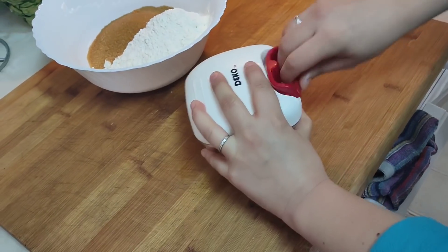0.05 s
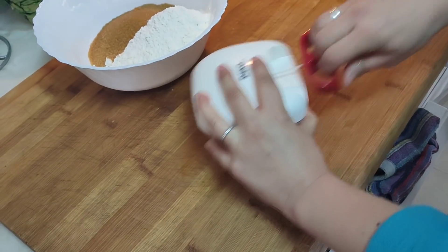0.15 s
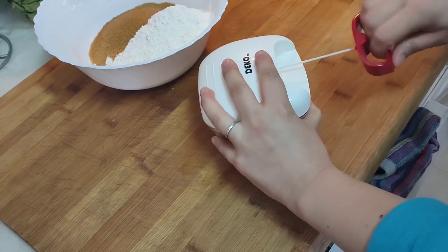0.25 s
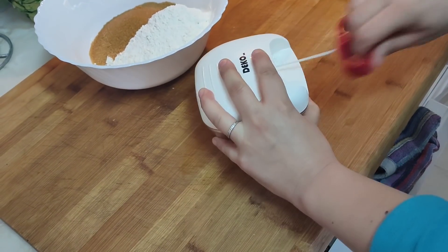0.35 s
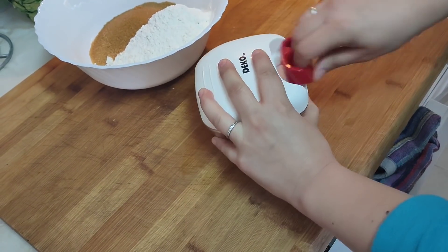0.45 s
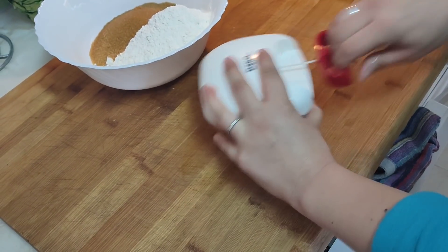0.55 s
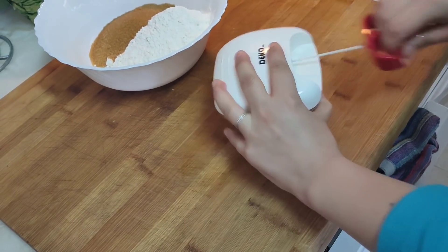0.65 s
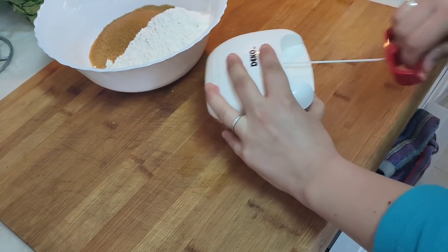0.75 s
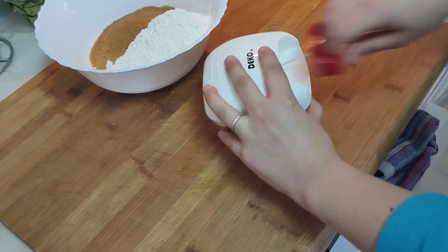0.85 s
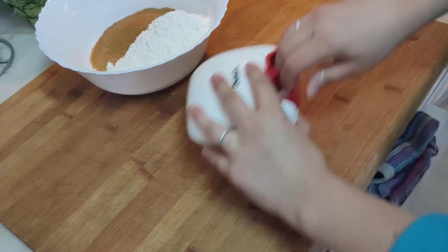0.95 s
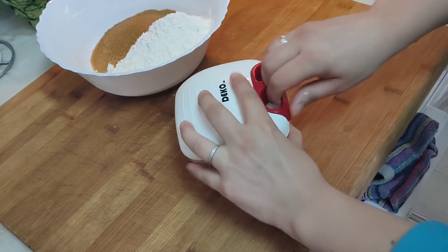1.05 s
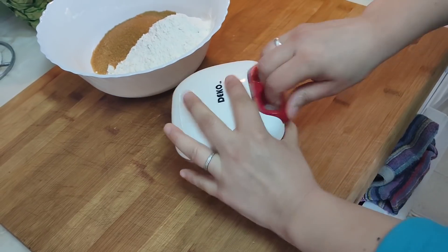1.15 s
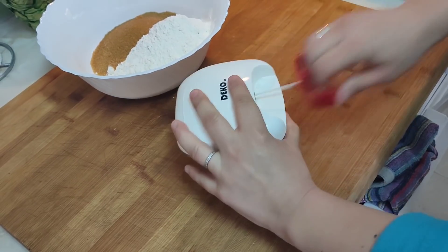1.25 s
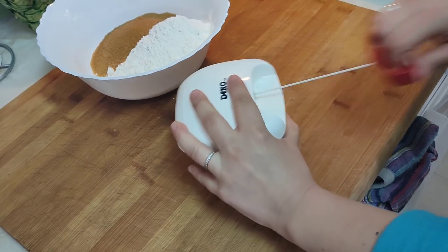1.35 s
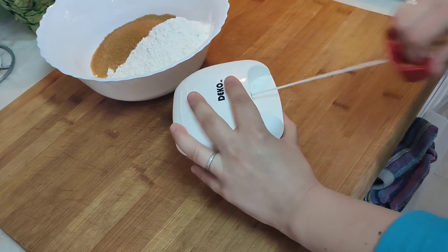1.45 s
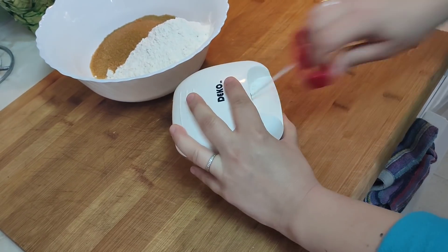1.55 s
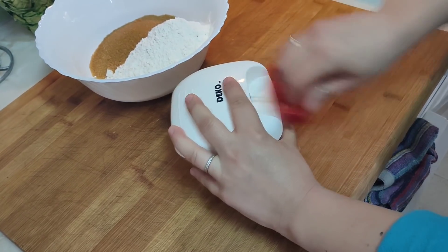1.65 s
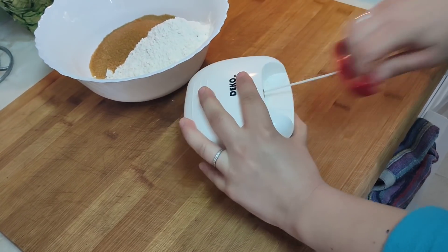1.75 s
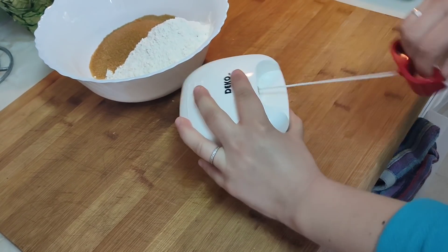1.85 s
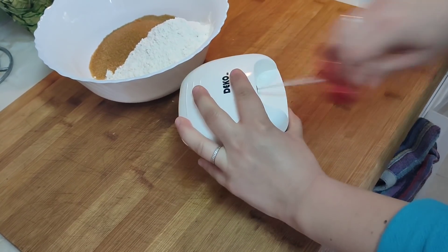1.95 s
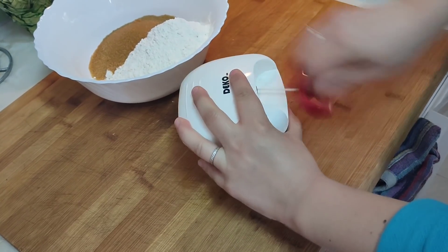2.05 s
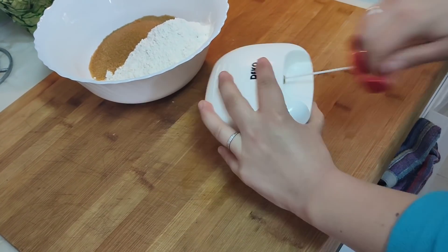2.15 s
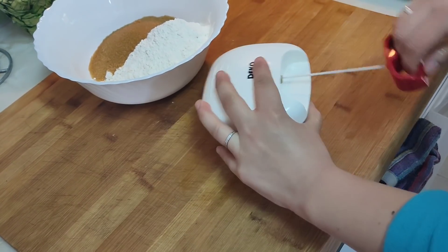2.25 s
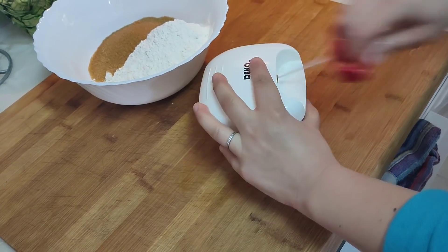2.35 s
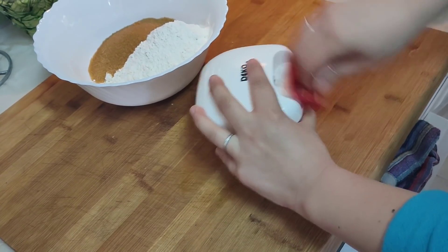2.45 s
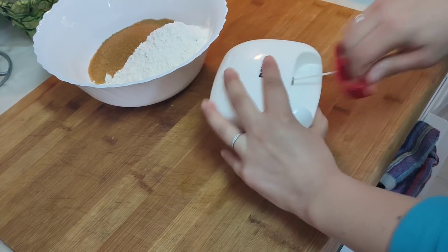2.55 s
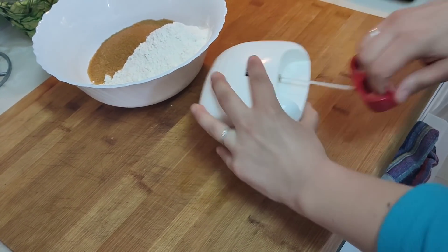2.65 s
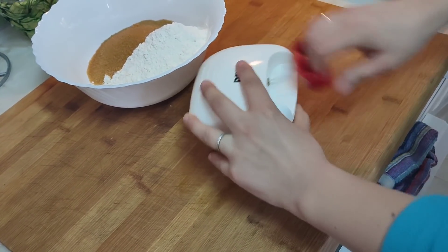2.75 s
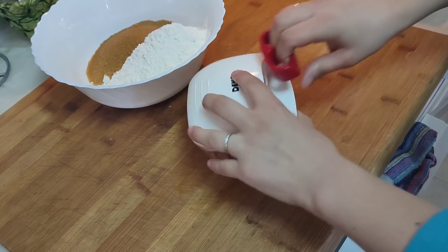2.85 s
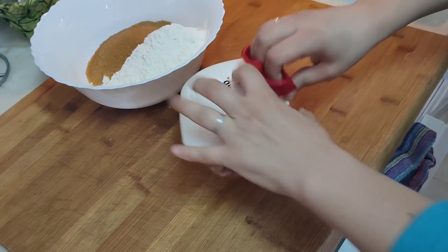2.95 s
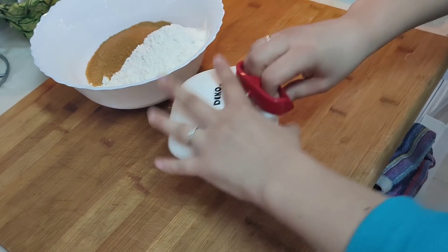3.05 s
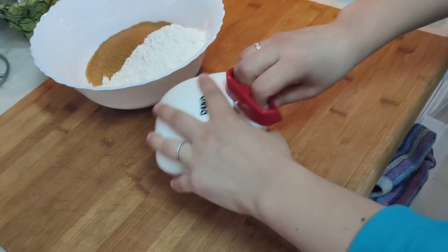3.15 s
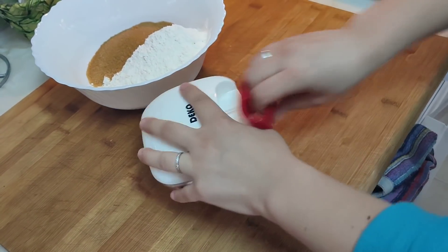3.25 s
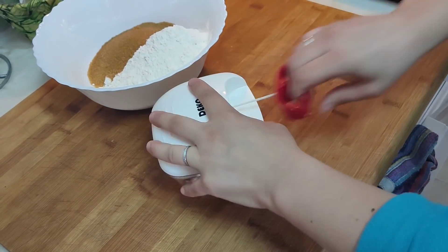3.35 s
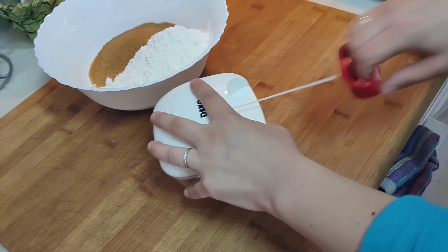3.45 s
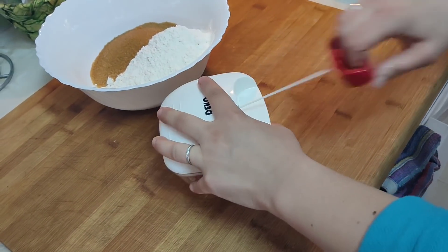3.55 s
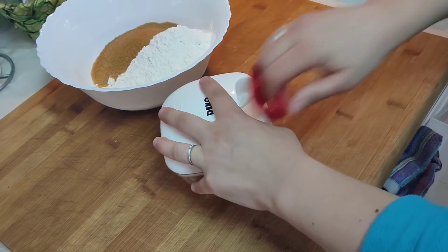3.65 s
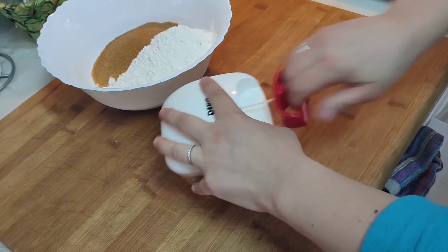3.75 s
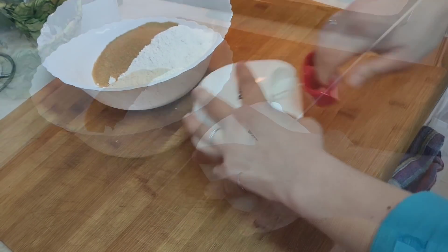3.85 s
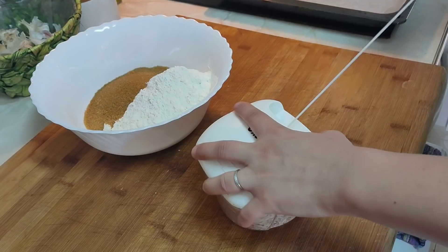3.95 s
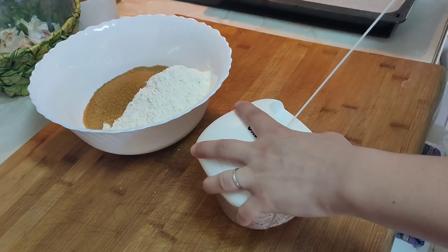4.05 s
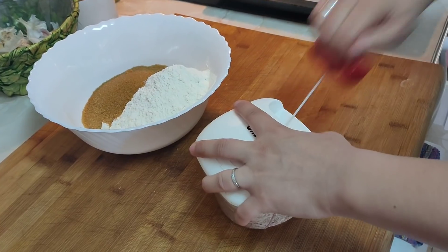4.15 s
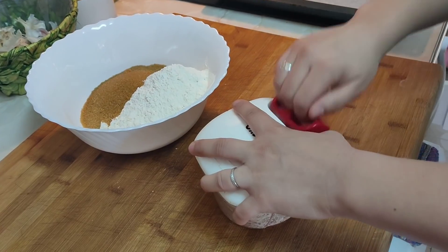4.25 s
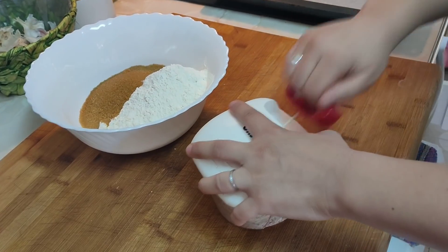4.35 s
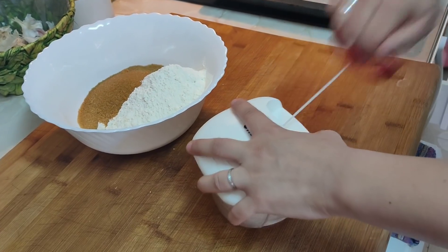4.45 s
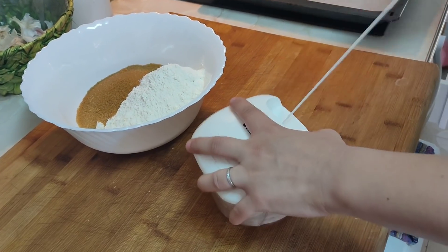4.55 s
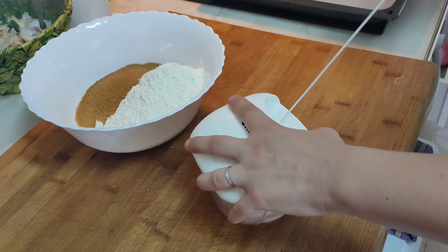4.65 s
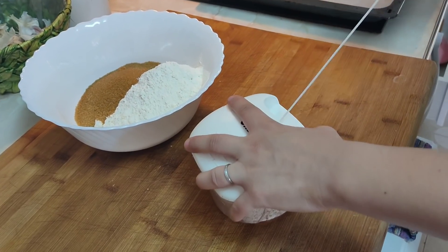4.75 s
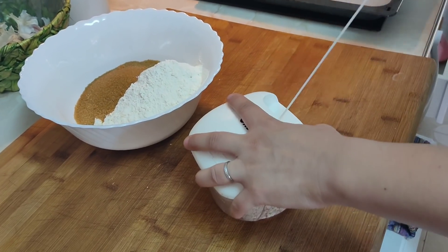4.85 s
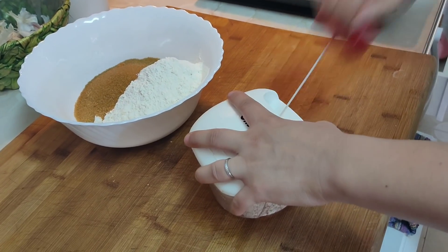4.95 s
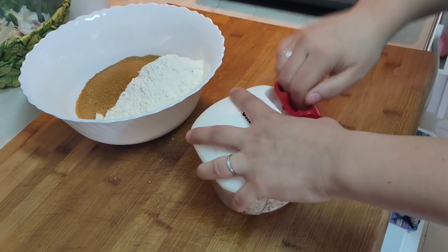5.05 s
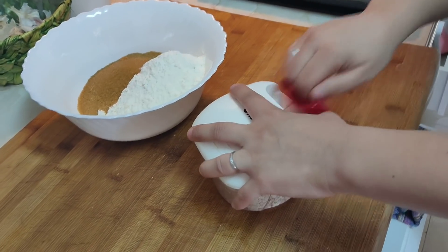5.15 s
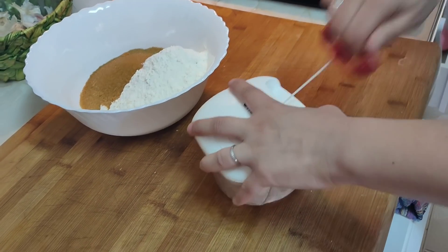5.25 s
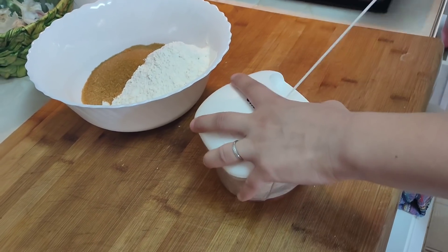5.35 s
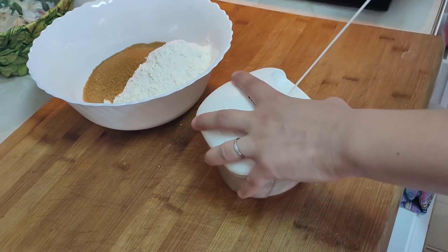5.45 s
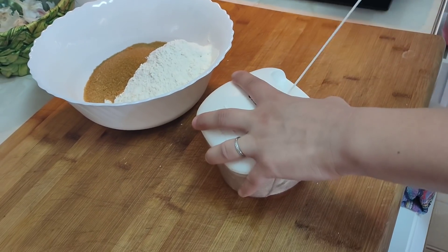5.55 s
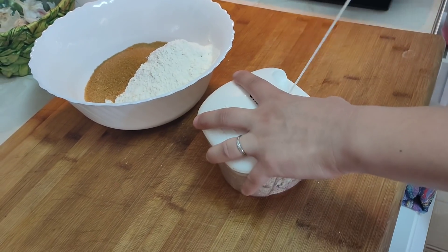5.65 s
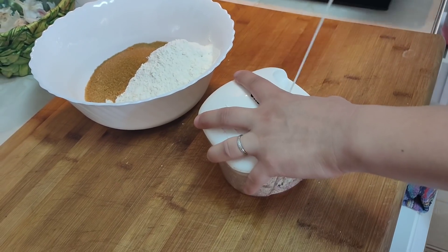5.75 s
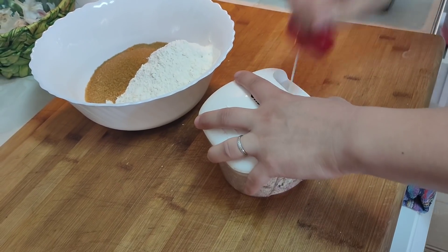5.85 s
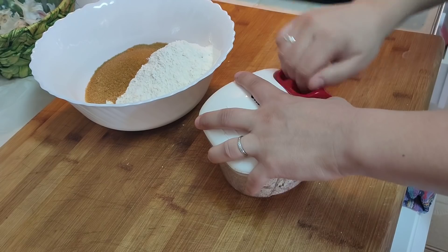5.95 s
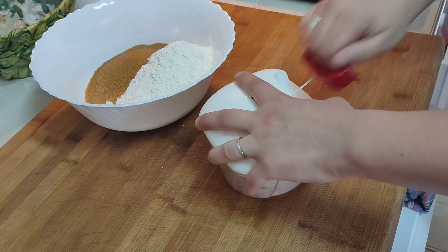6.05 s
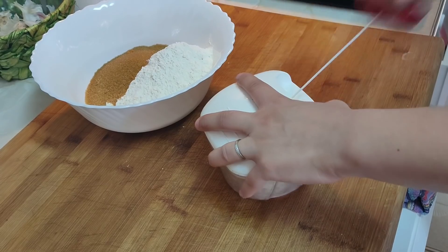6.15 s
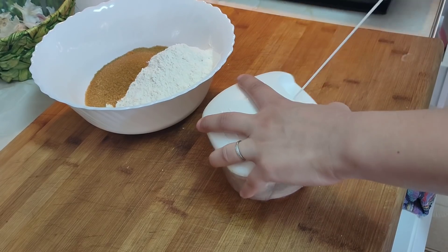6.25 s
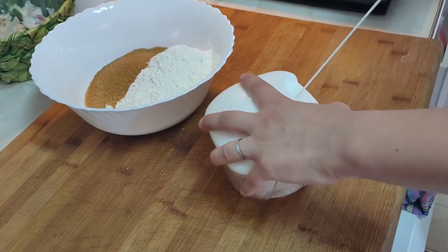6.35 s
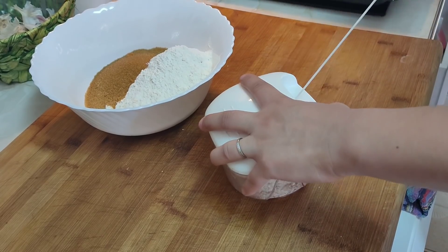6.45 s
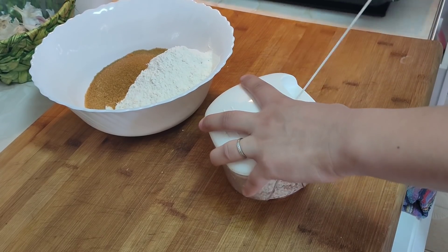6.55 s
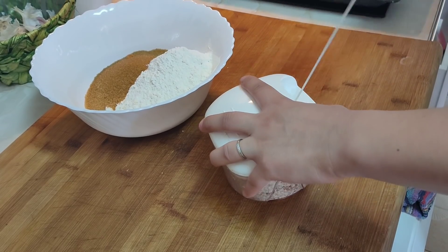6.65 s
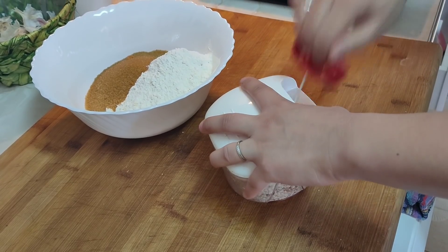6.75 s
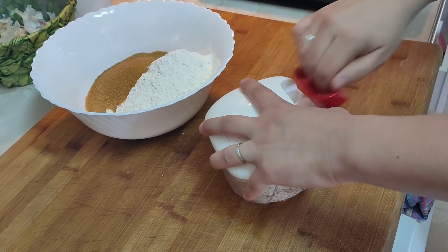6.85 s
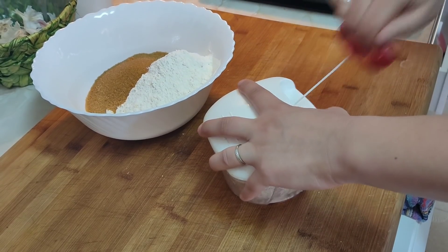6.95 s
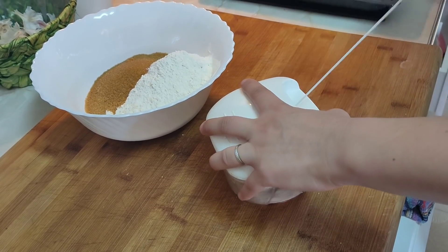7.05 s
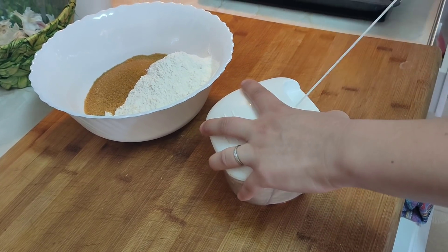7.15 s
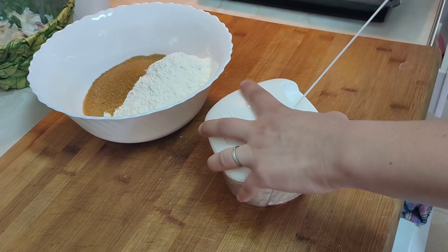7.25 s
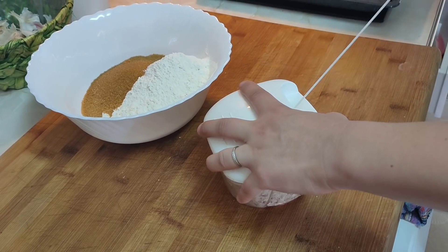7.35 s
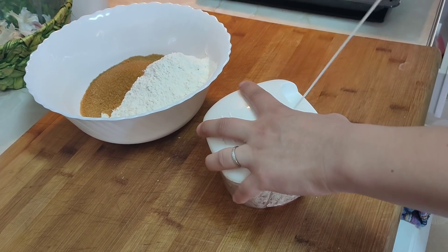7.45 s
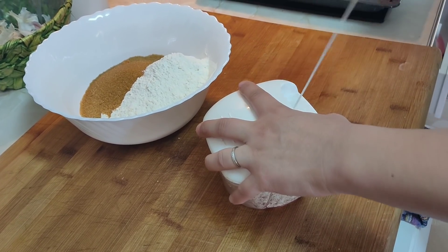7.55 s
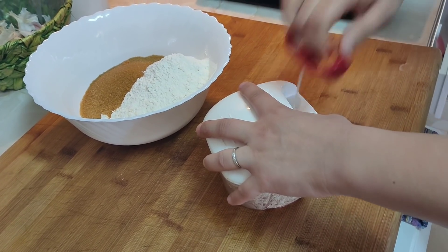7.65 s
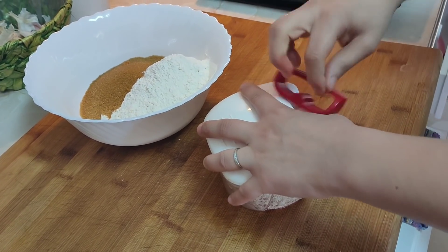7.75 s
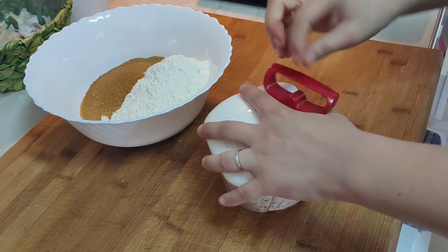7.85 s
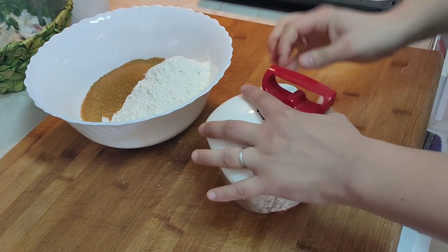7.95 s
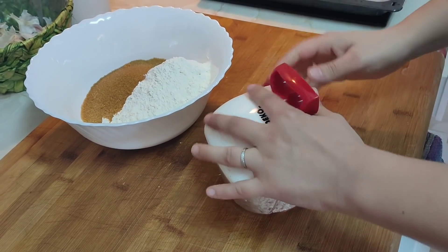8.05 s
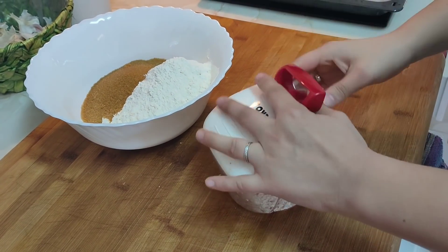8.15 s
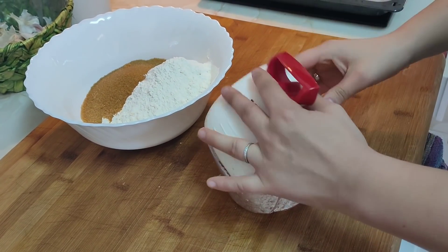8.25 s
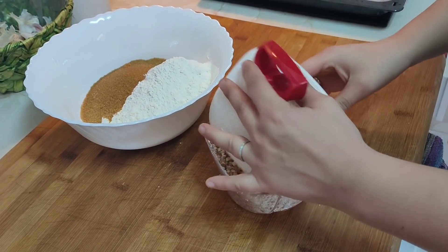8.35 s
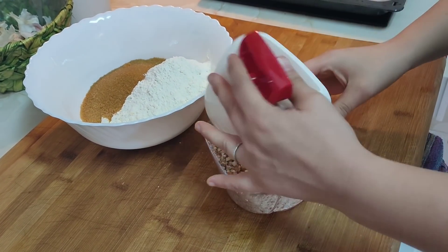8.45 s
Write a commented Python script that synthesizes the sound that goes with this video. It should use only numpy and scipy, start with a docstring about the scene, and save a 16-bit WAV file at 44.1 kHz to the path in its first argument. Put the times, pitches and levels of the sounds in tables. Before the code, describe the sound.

A pull-cord chopper works through nuts on a wooden board, heard close up in a small, slightly reverberant kitchen over a faint hum. From about 0.3 to 3 seconds, six quick pulls come roughly half a second apart. Each starts abruptly with a loud, crackling rattle of coarse pieces against the plastic cup, then dies away over a low boom. The handle clacks on the lid between pulls, and there are a few tiny squeaks. Another loud pull swells at about 3.4 seconds, after which the pieces sound finer. Four slower, somewhat softer pulls follow at around 4.5, 5.3, 6.2 and 7 seconds, with quieter cord rewinds and scattered plastic knocks around them. A last rewind near 7.5 seconds ends in a sharp clack at 7.8. From about 8.1 to 8.5 seconds, a hand faintly rubs and bumps the hollow lid.

```python
"""Chopping nuts in a pull-cord chopper

Each pull spins a blade that throws nut pieces against a small plastic cup on a wooden board. Impacts
excite cup, chips and a low boom of room and board, and the pieces turn from coarse to fine. The cord
rewinds more softly, cord or spindle squeaks, the handle knocks on the lid and a hand rubs it at the end.
A small hard kitchen reverberates over a faint hum; a two-port phone microphone listens close by."""
import sys
import numpy as np
from scipy import signal
from scipy.fft import rfft, irfft, next_fast_len
from scipy.io import wavfile
from scipy.ndimage import uniform_filter1d

SR = 44100
rng = np.random.default_rng(int(sys.argv[2]) if len(sys.argv) > 2 else 0)


def unload_audio(sound):
    """Save the sound as a 16-bit wav file, at the path given as the first command line argument."""
    columns = np.transpose(np.atleast_2d(sound))
    # keep every value between -1 and 1, then stretch to whole-number steps
    steps = np.round(np.clip(columns, -1, 1) * 32767)
    wavfile.write(sys.argv[1], SR, steps.astype(np.int16))


N = 375291
T = np.arange(N) / SR


def undb(db):
    """Amplitude ratio of a level in decibels."""
    return 10 ** (np.asarray(db) / 20)


def unit(x):
    """Normalisation to an rms of 1."""
    return x / np.sqrt(np.mean(x ** 2))


def at_frequency(table, hz):
    """Interpolation of (frequency, value) rows on a logarithmic frequency axis."""
    return np.interp(np.log(hz), np.log(np.array(table)[:, 0]), np.array(table)[:, 1])


def resonate(x, hz, width):
    """Second-order resonance with unit gain at its centre."""
    return signal.lfilter(*signal.iirpeak(hz, hz / width, SR), x)


def flutter(rate):
    """Random modulation: ramps between `rate` values a second, with a spread near 1."""
    step = int(SR / rate)
    held = np.repeat(rng.standard_normal(N // step + 1), step)
    return 1.2 * uniform_filter1d(held, step)[:N]


# Likeness of the sound at the two microphone ports: (frequency [Hz], coherence [0-1])
COHERENCE = [(60, 0.8), (250, 1), (520, 0.3), (750, 0.3), (950, 0.18), (1150, 0.4), (1500, 0), (2200, 0.02),
             (3100, 0), (15000, 0)]
def both_ports(mid, side, hz):
    """Spatial coherence: bass reaches both ports alike; treble leaves different walls and differs."""
    correlation = np.sqrt(at_frequency(COHERENCE, hz))
    opposed = side * np.array([[1], [-1]])
    return np.sqrt((1 + correlation) / 2) * mid + np.sqrt((1 - correlation) / 2) * opposed


# Spectrum of the quiet kitchen: (frequency [Hz], relative spectral density [dB])
MURMUR_SPECTRUM = [(18, -47), (30, -21.5), (319, 3.5), (499, -11.5), (584, -4), (1500, -25), (2120, -22.5),
                   (3980, -35), (8980, -26.5), (16000, -43.5)]
def hum(murmur_db=-60, mains_db=-76, mains_hz=101):
    """Background noise: a steady murmur of appliances and air, plus a mains tone of wavering level."""
    hz = np.fft.rfftfreq(N, 1 / SR) + 1
    mid, side = irfft(rfft(rng.standard_normal((2, N))) * undb(at_frequency(MURMUR_SPECTRUM, hz)), N)
    mains = undb(mains_db + 1.57 * flutter(4.4)) * np.sqrt(2) * np.sin(2 * np.pi * mains_hz * T)
    return undb(murmur_db) * unit(both_ports(mid, side, 400)) + mains


def fineness(time):
    """Fragmentation: 0 for coarse pieces, rising to 1 for fine crumbs."""
    return np.interp(time, (3.63, 4.05), [0, 1])


# The hand shifts cup or handle and the pieces slide:
# (start [s], rise [s], hold [s], coast [s], cup level [dB], chips re cup [dB], boom re cup [dB])
HAND_SHIFTS = [(0.0, 0.0012, .06, 0.27, -53.5, -5.5, -2), (0.19, 0.0084, .065, 0.026, -42, -6, -0.5),
               (0.622, .006, .02, 0.13, -40.5, -14, -6), (1.1, 0.022, .02, .1, -45.5, -14.5, -0.5),
               (1.24, .006, 0.02, .02, -47.5, -16, 9), (3.03, .01, 0.036, .06, -64.5, -9, 6.5),
               (2.165, .006, .045, 0.017, -38, -10.5, -9.5), (2.59, .006, .045, 0.018, -52.5, -5, 2.5),
               (3.158, 0.005, .05, 0.14, -49.5, -9, 7), (3.26, 0.058, .01, .04, -44.5, -4, 0.5),
               (3.346, 0.014, .04, 0.045, -43, -22.5, -22), (4.39, 0.031, .01, .02, -55, -14, 1),
               (5.2, 0.056, .01, .02, -71, -17, 1), (6.112, 0.017, .01, 0.038, -36.5, -2, -5.5),
               (8.284, 0.0063, .03, .06, -65, -8, 14), (8.35, .01, .1, .2, -75, -4, -4)]
# The cord spins the blade, which then coasts to rest: (same columns)
CORD_PULLS = [(0.262, 0.024, 0.047, 0.29, -19.5, -1, -11), (0.698, 0.021, 0.069, 0.31, -19.5, -1.5, -10.5),
              (1.334, 0.015, 0.14, 0.35, -22.5, 0, -9.5), (1.798, 0.028, 0.081, 0.36, -19, -1, -11),
              (2.215, 0.017, 0.05, 0.35, -20.5, -0.5, -8.5), (2.639, .018, 0.056, .28, -20.5, 0.5, -10),
              (3.386, 0.13, 0.015, 0.33, -20, 0.5, -8.5), (4.472, 0.14, 0.12, 0.17, -26.5, -4, -2.5),
              (5.292, 0.18, 0.081, 0.21, -25, -2.5, -4), (6.154, 0.15, 0.13, 0.15, -25, -2, -4),
              (6.988, 0.18, 0.11, 0.18, -27, -1, -4)]
# The spring winds the cord in and drags the spindle: (same columns)
SPRING_REWINDS = [(3.901, 0.084, .01, 0.17, -46, -1.4, -0.028), (4.086, 0.1, 0.017, 0.24, -36, -1, -1.6),
                  (4.913, 0.11, .02, 0.19, -35.5, -1, -0.28), (5.74, 0.096, 0.017, 0.31, -34, -1.1, -0.15),
                  (6.622, 0.13, .01, 0.26, -34.5, -0.23, -1), (7.467, 0.11, 0.018, 0.37, -38, -1.1, -0.43)]
def strokes(slack_s=0.02):
    """Power-law excitation: the drive on cup, chips and boom grows and dies with the speed of motion."""
    rise_powers, coast_powers = np.array([[1.85], [2.52], [1.13]]), np.array([[2.36], [2.57], [1.88]])
    slack_db = (-3, -7, -5)  # the drop as the cord goes slack over coarse pieces
    out = np.zeros((3, N + SR))
    # the exponent pairs shape the speed curve for (coarse, fine) pieces
    motions = (CORD_PULLS, (0.32, 0.67)), (SPRING_REWINDS, (0.25, 0.27)), (HAND_SHIFTS, (0.5, 0.5))
    for table, rise_shapes in motions:
        for start, rise, hold, coast, db, chips_db, boom_db in table:
            t = np.arange(int((rise + hold + coast) * SR)) / SR
            fine = fineness(start)
            rising = np.minimum(t / rise, 1) ** np.interp(fine, [0, 1], rise_shapes)
            coast_left = np.clip((rise + hold + coast - t) / coast, 0, 1)
            falling = coast_left ** np.interp(fine, [0, 1], (1.04, 1))
            drive = rising ** rise_powers * falling ** coast_powers
            slack = (table is CORD_PULLS) * (1 - fine) * np.clip((t - rise - hold) / slack_s, 0, 1)
            level = undb(db + np.array([[0], [chips_db], [boom_db]]) + np.outer(slack_db, slack))
            onset = int(start * SR)
            out[:, onset:onset + len(t)] += level * drive
    return out[:, :N]


def impacts(rate, spread_db, top_db, decay_ms, scrape):
    """Shot noise: the force envelope of pieces striking at random, a few harder, over an even scrape."""
    chance, size = rng.random((2, N))
    hits = (chance < rate / SR) * undb(np.minimum(-spread_db * np.log(1 - size), top_db))
    pulses = signal.lfilter([1], [1, -np.exp(-1000 / (decay_ms * SR))], hits)
    return unit(unit(pulses) + scrape)


def modal_body(modes, stir, knocks, flare_db, stages=1):
    """Modal superposition: a rough force drives resonances that each flare as the impact points move."""
    rough = rng.standard_normal((2, N))
    fine = fineness(T)
    out = 0
    for k, (hz, width, coarse_db, fine_db) in enumerate(modes):
        force = both_ports(*rough, hz)
        mode = stir * undb(flare_db * flutter(30)) * force
        for _ in range(stages - 1):
            mode = resonate(mode, hz, width)
        mode = resonate(mode + knocks * force, hz, width)  # blows pass one stage only and stay broad
        out = out + (-1) ** k * undb(coarse_db + fine * (fine_db - coarse_db)) * mode
    _, widths, *levels = np.transpose(modes)
    coarse_power, fine_power = (np.sum(np.pi * widths / SR / stages * undb(2 * db)) for db in levels)
    return out / np.sqrt(coarse_power + fine * (fine_power - coarse_power))


def roll_off(x, hz):
    """Low-pass radiation: a large or soft body sends out little above its modes."""
    return signal.sosfilt(signal.butter(2, hz, fs=SR, output="sos"), x)


# Resonances of the plastic cup and the flying chips:
# (frequency [Hz], bandwidth [Hz], relative level when coarse [dB], relative level when fine [dB])
CUP_MODES = [(552, 110, -11, -3.5), (700, 127, -4.5, 0), (788, 80, -0.5, -2), (942, 295, -5, -3.5),
             (1180, 262, -3, -5), (1450, 467, -6, -5), (1780, 240, -2, -3), (2018, 218, 0.5, -2),
             (2265, 287, 0, -4.5), (2650, 1100, -6.5, -9.5)]
CHIP_MODES = [(3360, 550, -10, -10.5), (4136, 520, 1.5, 0), (4700, 3500, -4.5, -5), (6610, 613, 3, 3.5),
              (7280, 790, -2, 0.5), (9020, 1300, -2.5, 0), (10770, 2300, -15, -11),
              (13500, 2700, -21.5, -16), (15300, 860, -21.5, -18.5)]
# Low resonances of the room and board, booming under knocks and rattle: (same columns)
LOW_BOOM_MODES = [(36, 28, -33, -32.5), (100.5, 17.4, -11, -12), (143, 16.8, -9.5, -5),
                  (195.3, 30.4, 0, -2), (206, 92, -11.5, -9), (286, 79, 1.5, 1), (322.6, 109.5, 0, -0.5),
                  (423, 182, -3, -2.5)]
def chopper():
    """Forced vibration: strokes and knocks make the cup rattle, chips crackle, room and board boom."""
    cup_drive, chip_drive, boom_drive = strokes() + shaken_pieces()
    _, knock_db, _, _, crack_db, thud_db, _ = np.transpose(HANDLING_KNOCKS)
    heaps = flutter(45)  # the blade meets heaps of pieces and gaps in turn
    hard_hits = impacts(rate=450, spread_db=3.7, top_db=13.5, decay_ms=1.4, scrape=1.0)
    light_hits = impacts(rate=1300, spread_db=7.2, top_db=3.7, decay_ms=0.98, scrape=0.31)
    cup_force = undb(2 + heaps) * cup_drive * hard_hits
    chip_force = undb(5 + 1.3 * heaps) * chip_drive * unit(0.33 * hard_hits + light_hits)
    boom_force = undb(0.5 + heaps) * boom_drive * hard_hits
    cup = modal_body(CUP_MODES, cup_force, blows(knock_db - 15, 0.8), flare_db=2.1, stages=2)
    chips = modal_body(CHIP_MODES, chip_force, blows(knock_db + crack_db + 1.5, 1), flare_db=0.89)
    thuds = blows(knock_db + thud_db - 8.5, 1.73)
    boom = modal_body(LOW_BOOM_MODES, boom_force, thuds, flare_db=1.3, stages=2)
    return roll_off(cup, 3900) + chips + roll_off(boom, 640)


# Handle, lid and large pieces knocking; the last four levels are relative to the first:
# (time [s], level [dB], ring frequency [Hz], ring [dB], crack [dB], thud [dB], shaken pieces [dB])
HANDLING_KNOCKS = [(0.131, -16, 1130, -3.5, -6.5, -13.5, -14), (0.191, -20.5, 1180, 1, -1.5, 0, -15),
                   (0.204, -11, 1800, -8, -12, -22, -25), (0.519, -10.5, 2200, -15, -25, -15, -21.5),
                   (0.536, -13.5, 1200, -5, -1, -32, -10), (0.619, -11, 870, -16, -8.5, -2, -19),
                   (1.007, -20, 3270, -4.5, 3, -15, -10.5), (1.064, -30, 695, 6.5, -14.5, -1, -7),
                   (1.139, -25, 924, -1.5, -10, -13, -26), (1.236, -18.5, 734, -1.5, -44, 0, -23),
                   (1.281, -22, 1280, -3, -7.5, 1.5, -3.5), (1.351, -7, 740, -5, -24, -17, -28),
                   (1.37, -26, 690, -6.5, 13.5, -21.5, -16), (1.418, -11.5, 1670, 3.5, -6, -34.5, -27),
                   (1.755, -9, 1030, -9.5, -8, -28.5, -23), (1.764, -13.5, 1000, -4, -17.5, -16.5, -9),
                   (2.126, -26, 1070, 7, -13.5, -20, -30), (2.155, -3, 1040, -11, -12.5, -16.5, -23),
                   (2.549, -17, 1180, -1, -6, -23, -11), (2.564, -11.5, 1190, -6.5, -8.5, -9, -8.5),
                   (2.865, -26, 1910, 1, -19, -29.5, -8.5), (2.909, -22, 579, -8.5, -40, 3, -23),
                   (3.152, -17.5, 1350, -8, -8.5, -16, -29), (3.182, -21.5, 706, 0, -27, -2, -22),
                   (3.294, -34, 764, 7.5, -2.5, -24, -16), (3.312, -31, 500, 6, -25, -7, -22),
                   (3.351, -26.5, 1450, 2.5, -8.5, -6, -0.5), (3.391, -16.5, 790, 3, -20, -11, -17),
                   (3.436, -17, 2290, 6, 5.5, -24.5, -35), (3.829, -13, 806, -7, -7, -16.5, -12),
                   (4.091, -34, 1220, -1, -14, -14, -13), (4.23, -28, 302, -1, -20, -3, -24),
                   (4.343, -4.5, 710, -9, -19, -29, -22.5), (4.461, -17, 598, -17, -7, -4, -7.5),
                   (5.146, -9.5, 2400, 0, -10, -19, -17.5), (5.235, -27, 700, -18, -21, -22, -16),
                   (5.288, -13.5, 1530, -6, -7.5, -4, -18.5), (5.441, -19, 720, 5, -26.5, -27, -28),
                   (5.453, -27, 1070, -3, -24.5, -20, -27), (5.669, -17, 1200, -1.5, -8.5, -29.5, -27),
                   (5.742, -32, 2000, -4, -3, -14, -20), (6.035, -17.5, 2650, -2.5, 2, -16, -16),
                   (6.065, -12.5, 1330, -13, -16, -24, -29), (6.134, -20.5, 802, -11.5, -2, -23, -23),
                   (6.48, -15.5, 704, -8, 0.5, -12, -26), (6.629, -29.5, 2000, -7, -2, -14, -13),
                   (6.921, -21.5, 710, -19, -21, -16, -27), (6.992, -16, 630, -21.5, -7, -4, -17),
                   (7.11, -17.5, 700, 2.5, -21, -9, -7), (7.16, -9.5, 700, 1.5, -7, -11.5, -9.5),
                   (7.474, -33, 1500, -6, -7.5, -7, -18), (7.829, -0.5, 2770, -16, -16.5, -13.5, -21.5),
                   (8.115, -41, 703, -3.5, -15, 9, -12), (8.287, -40.5, 737, -4, -28, 9, -27)]
def knock_rings(low_t60=0.018, high_t60=0.012, attack_s=0.0011):
    """Damped free vibration: each knock rings a low and a high mode of whatever it meets."""
    out, t = np.zeros(N + SR), np.arange(SR // 5) / SR
    high_modes_hz = 6900 * (1 + 0.12 * rng.uniform(-1, 1, len(HANDLING_KNOCKS)))
    for (start, db, low_hz, ring_db, crack_db, _, _), high_hz in zip(HANDLING_KNOCKS, high_modes_hz):
        low = undb(ring_db - 60 * t / low_t60) * np.sin(2 * np.pi * low_hz * t)
        high = undb(crack_db - 8 - 60 * t / high_t60) * np.sin(2 * np.pi * high_hz * t)
        onset = int(start * SR)
        out[onset:onset + len(t)] += undb(db) * (low + high) * np.minimum(t / attack_s, 1)
    return out[:N]


def blows(levels_db, stretch):
    """Contact force: the envelope of each knock rises quickly and decays as the part settles."""
    out, t = np.zeros(N + SR), np.arange(SR // 10) / SR
    settle_s = 0.00414 * stretch
    push = np.exp(-t / settle_s) * np.minimum(t / (0.18 * settle_s), 1)
    for (start, *_), db in zip(HANDLING_KNOCKS, levels_db):
        onset = int(start * SR)
        out[onset:onset + len(t)] += undb(db) * push
    return out[:N]


def shaken_pieces(jump_db_per_s=698.5, roll_db_per_s=137.5):
    """Two-stage decay: after a knock the pieces jump, then roll on faintly."""
    out, t = np.zeros((3, N + SR)), np.arange(SR // 2) / SR
    shares_db = np.array([[-4.5], [-16], [-7.5]])  # cup, chips, boom
    shake = undb(-jump_db_per_s * t) + undb(-19 - roll_db_per_s * t)
    for start, db, *_, shake_db in HANDLING_KNOCKS:
        onset = int(start * SR)
        out[:, onset:onset + len(t)] += undb(db + shake_db + shares_db) * shake
    return out[:, :N]


# Cord or spindle squeaks, or the handle rings: (time [s], frequency [Hz], level [dB], length [s])
SQUEAK_TONES = [(0.266, 1780, -17, .03), (0.747, 4250, -18, 0.018), (0.912, 4140, -35, 0.022),
                (1.011, 3120, -32.5, 0.014), (1.013, 6030, -30.5, 0.017), (3.41, 4520, -28.5, .03),
                (2.818, 1790, -24, 0.044), (2.875, 1790, -41, 0.04), (8.117, 7060, -60, 0.011)]
def squeaks(width_hz=160):
    """Narrow-band noise: a sharp resonance gives rough tones that swell fast and die away."""
    out, rough = np.zeros(N), rng.standard_normal(N)
    for start, hz, db, length in SQUEAK_TONES:
        t = np.arange(int(2 * length * SR)) / SR
        onset = int(start * SR)
        force = rough[onset - SR // 10:onset + len(t)]  # a lead-in lets the resonance build up
        tone = unit(resonate(force, hz, width_hz)[-len(t):])
        swell = 3 * t / length * np.exp(1 - 3 * t / length)
        out[onset:onset + len(t)] += undb(db) * np.sqrt(0.5) * swell * tone
    return out


# A hand rubs the hollow lid: (time [s], peak level [dB], swell time [s])
LID_RUBS = [(8.112, -48, 0.0092), (8.285, -52, 0.0085), (8.303, -44.5, 0.0063), (8.322, -42, 0.0093)]
# The lid's two lowest modes: (frequency [Hz], bandwidth [Hz], relative level [dB])
LID_RESONANCES = [(710, 76, 7), (905, 140, -5)]
def lid_rubbing():
    """Frictional excitation: soft swells of rubbing noise drive the modes of the lid."""
    envelope = 0
    for start, db, swell_s in LID_RUBS:
        age = np.maximum(T - start, 0) / swell_s
        envelope = envelope + undb(db) * age * np.exp(1 - age)
    rough = both_ports(*rng.standard_normal((2, N)), 750)
    modes = (undb(db) * resonate(resonate(rough, hz, width), hz, width)
             for hz, width, db in LID_RESONANCES)
    return envelope * unit(sum(modes))


# Reverberation by band: (frequency [Hz], time to fall 60 dB [s], level [dB])
ROOM_BANDS = [(101, 0.43, -9.5), (302, 0.5, -7.5), (870, 0.48, -7.5), (1450, 0.43, -16), (2330, 0.38, -6.5),
              (4040, 0.38, -5.5), (6660, 0.32, -6), (12430, .3, -8.5)]
def kitchen(x, build_up_s=0.0093):
    """Diffuse reverberation: dense echoes from tiles and cupboards die sooner in the treble."""
    t = np.arange(int(0.7 * SR)) / SR
    hz = np.fft.rfftfreq(len(t), 1 / SR) + 1
    tail = 0
    for centre_hz, t60, db in ROOM_BANDS:
        band = at_frequency([(row[0], row[0] == centre_hz) for row in ROOM_BANDS], hz)
        mid, side = irfft(rfft(rng.standard_normal((2, len(t)))) * np.sqrt(band), len(t))
        decay = undb(-60 * t / t60) * np.minimum(t / build_up_s, 1)
        tail = tail + undb(db) * both_ports(mid, side, centre_hz) * decay / np.sqrt(np.sum(decay ** 2))
    return signal.fftconvolve(x.mean(0, keepdims=True) * np.sqrt(2), tail, axes=1)[:, :N]


def scene():
    """Superposition of direct sound, reverberation and background noise."""
    chopping = chopper()
    close = knock_rings() + lid_rubbing()  # these sound close and dry, with less reverberation
    working = chopping + squeaks()
    return working + close + kitchen(working + undb(-7) * close) + hum()


# Colouring by each port's small cavity: (frequency [Hz], left minus right level [dB])
PORT_BALANCE = [(100, 2), (400, -1), (750, 2), (1100, -1.5), (2000, -7), (3000, -1.5), (5200, 1.5),
                (6600, -5.5), (7800, 0.5), (9100, 17.5), (11000, 13), (13000, 2), (15500, 2)]
def record(dry, right_delay_s=0.00007, bass_cut_hz=60, top_cut_hz=15750):
    """Transduction: each port colours the sound, the right one late; then saturation and band limits."""
    size = next_fast_len(N)
    hz = np.fft.rfftfreq(size, 1 / SR) + 1
    ratio = undb(at_frequency(PORT_BALANCE, hz))
    delay = np.exp(-2j * np.pi * hz * right_delay_s)
    ports = np.array([ratio, delay]) * np.sqrt(2 / (1 + ratio ** 2))
    x = irfft(rfft(dry, size) * ports, size)[:, :N]
    x = np.tanh(x)  # the preamplifier rounds the peaks
    x = signal.sosfilt(signal.butter(1, bass_cut_hz, "high", fs=SR, output="sos"), x)
    return signal.sosfilt(signal.ellip(10, 0.2, 70, top_cut_hz, fs=SR, output="sos"), x)


dry = scene()
out = record(dry)
unload_audio(out)
```